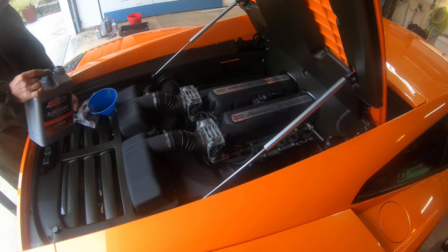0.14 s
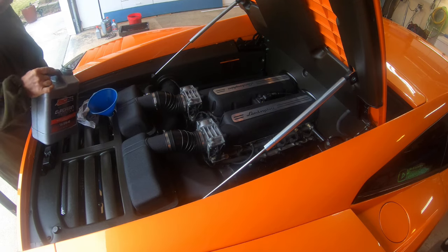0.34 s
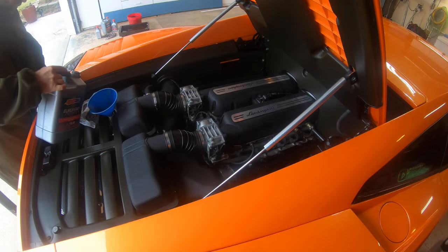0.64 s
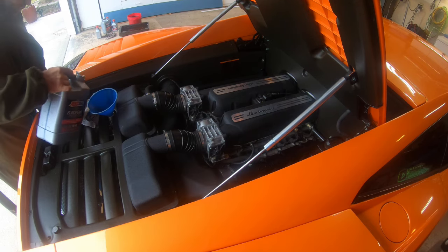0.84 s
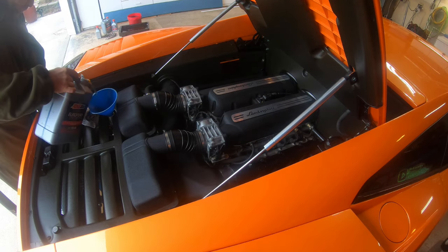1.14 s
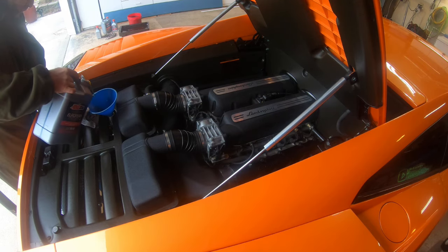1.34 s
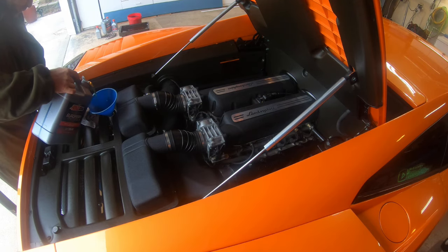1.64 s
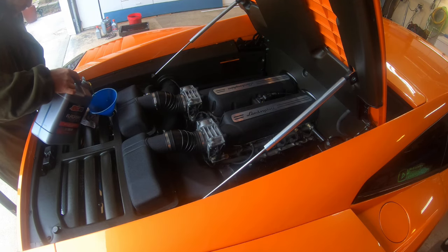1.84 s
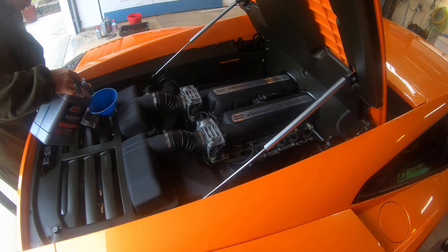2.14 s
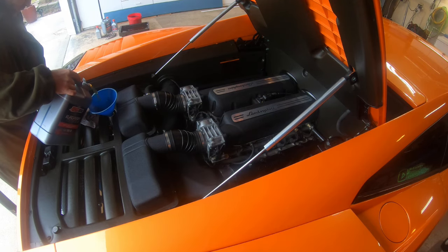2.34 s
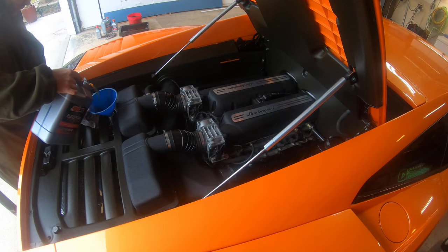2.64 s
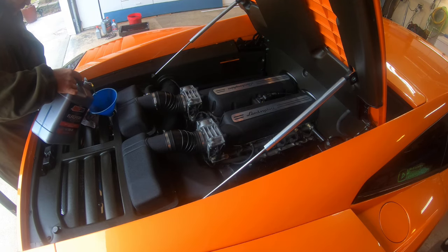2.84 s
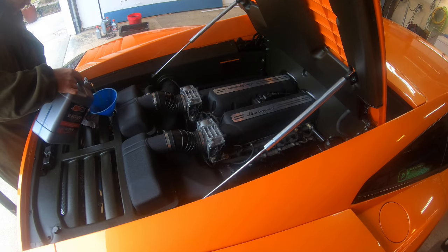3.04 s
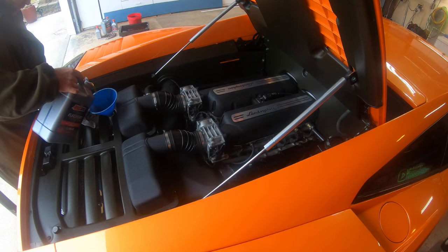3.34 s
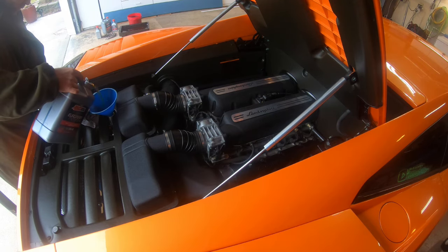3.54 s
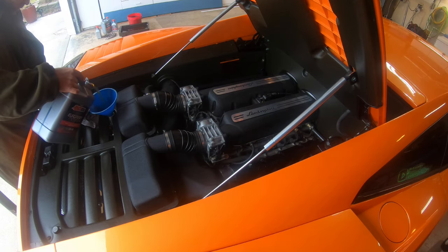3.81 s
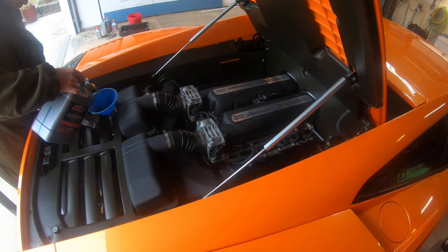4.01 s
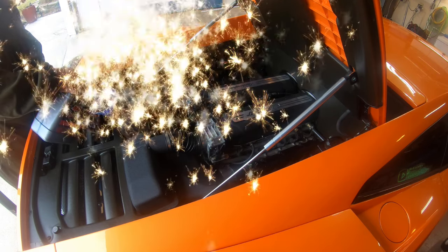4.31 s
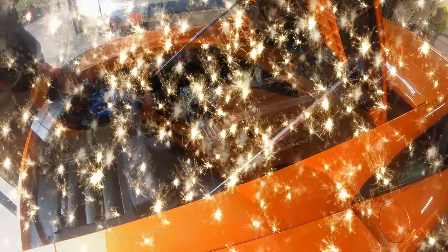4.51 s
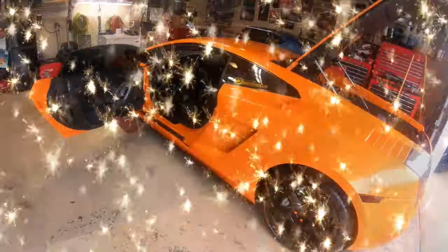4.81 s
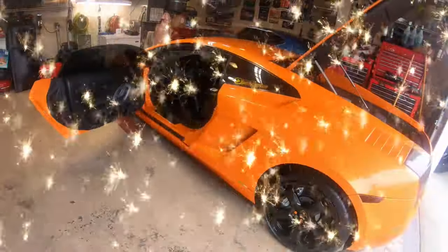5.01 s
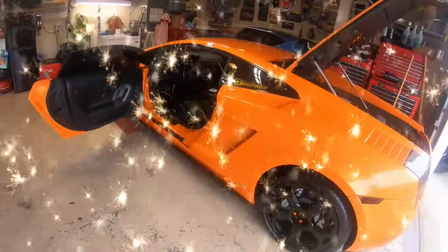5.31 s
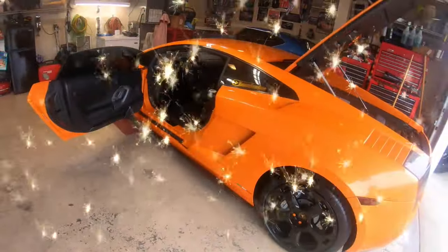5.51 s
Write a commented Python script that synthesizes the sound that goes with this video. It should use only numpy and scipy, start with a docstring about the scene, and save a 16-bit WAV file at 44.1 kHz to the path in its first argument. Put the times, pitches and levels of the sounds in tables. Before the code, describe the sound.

Thick oil gulps, pops and trickles from a plastic jug in a garage, stops dead, and a big car engine idles loudly.

```python
"""A sleeve rustles and a plastic jug knocks as it is tipped over a funnel in an engine bay, in a garage.
The oil glugs: gulps of air thump, bubbles pop, clear tones ring, and the stream trickles and squelches.
The sound stops dead; after a short silence a big engine fades in, idling.
Cloth, air and stream are coloured noise, impacts are kicks into decaying resonances, clear tones and
froth are damped sines, and the engine is a set of firing orders with mechanical noise."""
import sys
import numpy as np
from scipy import signal
from scipy.fft import rfft, irfft
from scipy.io import wavfile
from scipy.ndimage import uniform_filter1d

SR = 44100
rng = np.random.default_rng(int(sys.argv[2]) if len(sys.argv) > 2 else 0)


def pcm_store(signal):
    """Save signal as 16-bit PCM."""
    levels = np.round(np.clip(np.atleast_2d(signal), -1, 1) * 32767)
    wavfile.write(sys.argv[1], SR, levels.astype(np.int16).T)


N = 249958
TIME = np.arange(N) / SR


def gain_of(db):
    """Logarithmic levels: decibels become an amplitude ratio."""
    return 10 ** (np.asarray(db) / 20)


def evened(x):
    """Power normalisation: scales all channels so that the first has rms 1."""
    return x / np.sqrt(np.mean(np.atleast_2d(x)[0] ** 2) + 1e-20)


def level(rows):
    """Amplitude envelope: gain over time from rows of (s, dB), silent outside them."""
    return gain_of(np.interp(TIME, *np.transpose(rows), left=-200, right=-200))


def colour(x, points):
    """Linear filtering: weights the spectrum by points of (Hz, dB), joined on a log frequency axis."""
    hz, db = np.transpose(points)
    bins = np.fft.rfftfreq(N, 1 / SR)
    gain_db = np.interp(np.log(bins + 1), np.log(hz + 1), db)
    return irfft(rfft(x) * gain_of(gain_db), N)


def noise(points):
    """Coloured noise: independent mid and side of a given spectrum, mid at rms 1."""
    return evened(colour(rng.standard_normal((2, N)), points))


def wander(size, count=N):
    """Smoothed chance: a slow random curve of rms 1, changing over about size samples."""
    smooth = uniform_filter1d(rng.standard_normal(count), size)
    return evened(uniform_filter1d(smooth, size))


def band(x, hz, q):
    """Simple resonator: a fixed band-pass of gain 1 at its centre."""
    w = 2 * np.pi * min(hz, SR / 2 - 1000) / SR
    a = np.sin(w) / (2 * q)
    return signal.lfilter([a, 0, -a], [1 + a, -2 * np.cos(w), 1 - a], x)


def resonate(x, hz, width_hz):
    """Moving resonance: shifts the curve hz down to zero, smooths there, and shifts back up."""
    turn = np.exp(2j * np.pi * np.cumsum(hz) / SR)
    r = np.exp(-np.pi * width_hz / SR)
    return 2 * (turn * signal.lfilter([1 - r], [1, -r], x / turn)).real


# Spectrum of the sliding cloth. Each row: frequency in Hz, relative level in dB per Hz.
SLEEVE_SPECTRUM = [(150, -32), (250, 5), (364, -3.5), (486, -21), (770, -1), (929, -9.5), (1520, 0),
                   (1750, -4), (3220, -4.5), (8230, -13.5), (14700, -33)]
# Rise and fall of the rustle. Each row: time in seconds, level in dB before the trim.
SLEEVE_LEVEL = [(0.0, -64), (0.11, -58.5), (0.274, -60.5), (0.508, -61.5), (0.636, -62), (0.828, -65),
                (1.13, -71.5), (1.25, -76)]


def sleeve(catch_db=1, snags_per_s=220, snag_db=-6, trim_db=-1):
    """Stick-slip friction: cloth slides over cloth, catching unevenly; single fibres snag and let go."""
    snags = (rng.random(N) < snags_per_s / SR) * rng.exponential(1, N)
    release = np.exp(-np.arange(600) / 130)
    scratch = evened(signal.oaconvolve(snags, release)[:N])
    cloth = noise(SLEEVE_SPECTRUM) + gain_of(snag_db) * scratch * noise(SLEEVE_SPECTRUM)
    return level(SLEEVE_LEVEL) * gain_of(trim_db + catch_db * wander(size=500)) * cloth


# Spectrum of the still air. Each row: frequency in Hz, relative level in dB per Hz.
AIR_SPECTRUM = [(12, -41), (20, -15), (42, -22), (117, -31.5), (177, -9.5), (283, -37.5), (344, -17.5),
                (429, -28.5), (520, -24), (565, -33), (667, -22), (955, -28), (1900, -34), (3910, -34),
                (14700, -65)]
# The hollow low drone. Each row: time in seconds, level in dB before drone_db is added.
DRONE_LEVEL = [(0, -65.5), (.95, -79), (1.17, -55), (1.28, -67.5), (2.0, -62), (2.9, -69.5), (4.25, -59),
               (4.6, -64.5), (4.77, -59.5), (5.26, -60)]
# The soft low bump. Each row: time in seconds, level in dB.
BUMP_LEVEL = [(3.56, -87), (3.595, -46), (3.635, -43), (3.67, -52), (3.73, -55), (3.8, -65.5),
              (3.87, -71.5)]
# Spectrum of the bump. Each row: frequency in Hz, relative level in dB per Hz.
BUMP_SPECTRUM = [(15, -36.5), (25, 1), (49, 5), (75, -1.5), (102, 2), (173, 5.5), (250, -40), (320, -49),
                 (550, -120)]


def garage(air_db=-65, drone_hz=176, drone_q=5.24, drone_db=-2):
    """Broadband and resonant background: still air, a hollow drone and one soft bump."""
    hollow = band(rng.standard_normal((2, N)), drone_hz, drone_q)
    drone = evened(band(hollow, drone_hz, drone_q))
    air = gain_of(air_db) * noise(AIR_SPECTRUM)
    bump = level(BUMP_LEVEL) * noise(BUMP_SPECTRUM)
    return air + gain_of(drone_db) * level(DRONE_LEVEL) * drone + bump


# Resonances of the jug and funnel. Each row: frequency in Hz, bandwidth in Hz, and level in dB
# over the unringing sound before ring_db is added.
JUG_MODES = [(281, 34, -0.5), (375, 42, -9.5), (488.6, 8.8, -6), (745, 18, 1.5), (939, 8.2, -3),
             (1219, 146, -8), (1642, 5.7, 0), (1952, 16, 0), (2360, 24, -4), (2653, 14, -3), (3067, 20, 0),
             (3443, 76, -3.5), (3760, 23, 1), (4110, 35, -2), (4560, 13, -28), (6000, 21, -5),
             (7400, 110, -8.5)]


def jug(x, ring_db):
    """Modal resonance: adds the ringing of the plastic jug and funnel to the sound that excites it."""
    return x + sum(gain_of(db + ring_db) * band(x, hz, hz / width) for hz, width, db in JUG_MODES)


def bursts(rows, direct, ring_db, room_db, room_t60, low_hz, rise_s):
    """Impulse and reverberation: each kick arrives directly, then off the engine bay, then garage walls.

    Each row: start in seconds, level in dB, centre in Hz, sharpness Q, t60 in seconds."""
    out, t = np.zeros((2, N + SR)), np.arange(SR // 2) / SR
    low_cut = signal.butter(4, low_hz, "high", fs=SR, output="sos")
    for s, db, hz, q, t60 in rows:
        near_decay = gain_of(-60 * t / t60)
        room_decay = gain_of(room_db - 60 * t / room_t60)
        echoes = np.hypot(near_decay, room_decay)
        size = np.linalg.norm(echoes)
        kick = echoes * (1 - np.exp(-t / rise_s)) * rng.standard_normal((2, len(t)))
        kick[0, 0] += direct * size  # the direct arrival is in the mid only
        shaped = band(band(kick, hz, q), hz, q)
        sound = signal.sosfilt(low_cut, jug(shaped, ring_db))
        at = round(s * SR)
        # equal energy to the bare decay, so that level is where the decay starts
        out[:, at:at + len(t)] += gain_of(db) * size * sound / np.linalg.norm(sound[0])
    return out[:, :N]


# Handling of the jug. Each row: start in seconds, level in dB, centre in Hz, sharpness Q, t60 in seconds.
KNOCKS = [(.479, -53, 2540, 2, 0.1), (.631, -51.5, 610, 0.22, 0.2), (.885, -47.5, 2140, 0.33, 0.12),
          (1.582, -55.5, 290, 1.5, 0.079), (1.592, -66, 3220, 2.2, 0.11), (1.641, -51, 1540, 2.2, 0.068)]


def knocks():
    """Impact excitation: handling knocks set the jug ringing."""
    return bursts(KNOCKS, direct=0.41, ring_db=6, room_db=-6, room_t60=.3, low_hz=149.5, rise_s=0.0005)


# The running stream as the jug tips. Each row: time in seconds, level in dB without the surges.
FLOW_LEVEL = [(1.5, -75), (1.7, -63), (1.95, -62), (2.6, -62), (3.3, -64), (3.68, -53.5), (3.9, -59.5),
              (4.5, -57), (5.27, -62)]


def flow(surge_db=-15.5, surge_lag_s=0.026):
    """Addition of powers: a steady run, and a surge of oil that swells and ebbs after each gulp."""
    power = level(FLOW_LEVEL) ** 2
    age = np.arange(SR // 2) / SR / surge_lag_s  # the surge peaks at age 1
    for s, gulp_db, _ in GULPS:
        part = power[round(s * SR):][:len(age)]  # a view, so adding here adds to power
        surge = gain_of(gulp_db + surge_db) * age * np.exp(1 - age)
        part += (surge ** 2)[:len(part)]
    return np.sqrt(power)


# Colour of the stream. Each row: frequency in Hz, relative level in dB per Hz.
STREAM_SPECTRUM = [(88, -51), (150, -3), (290, -1), (615, -16), (739, -12.5), (1070, -24), (1210, -10),
                   (2030, -17.5), (2570, -34), (3920, -26), (8630, -35.5), (12000, -49.5), (15600, -87.5),
                   (22000, -120)]


def trickle(per_s=260, spread_db=5.5, t60=0.32):
    """Random impulse train: many tiny bubbles tick in the funnel under the stream, and reverberate."""
    ticked = rng.random(N) < per_s / SR
    strength = gain_of(spread_db * np.minimum(rng.exponential(1, N), 4))
    ticks = ticked * strength * rng.choice([-1, 1], N)
    t = np.arange(SR // 4) / SR
    echoes = rng.standard_normal((2, len(t))) * gain_of(-60 * t / t60)
    wet = signal.fftconvolve(ticks[None], echoes, axes=1)[:, :N]
    return evened(colour(jug(wet, ring_db=1.5), STREAM_SPECTRUM))


def froth(per_s=170, low_hz=600, high_hz=4200, cycles=11, spread_db=3, rise=0.073, trim_db=-6, count=24):
    """Damped bubble resonance: small bubbles of many sizes blip briefly in the thick oil."""
    out, t = np.zeros((2, N)), np.arange(SR // 12) / SR
    for hz in np.geomspace(low_hz, high_hz, count):
        decay = np.exp(-t * hz / cycles)
        tone = np.sin(2 * np.pi * hz * (t + rise * t * t))  # pitch lifts as the blip fades
        blip = decay * tone * np.sqrt(low_hz / hz)
        born = rng.random(N) < per_s / count / SR
        births = born * gain_of(spread_db * np.minimum(rng.exponential(1, N), 3))
        mid_and_side = [1, rng.uniform(-1.2, 1)]  # each size has its own place
        out += np.outer(mid_and_side, signal.oaconvolve(births, blip)[:N])
    return gain_of(trim_db) * evened(out)


# Bubbles bursting at the spout and in the funnel. Each row: start in seconds, level in dB, centre in Hz,
# t60 in seconds.
POPS = [(1.862, -55, 1350, .14), (2.015, -50, 1290, 0.16), (2.081, -54.5, 3020, 0.18),
        (2.219, -50, 1690, 0.23), (2.265, -48.5, 1330, 0.21), (2.325, -55, 1420, .08),
        (2.486, -43, 1010, 0.16), (2.496, -47.5, 1730, 0.12), (2.83, -51.5, 2060, 0.24),
        (3.0587, -44, 1600, 0.13), (3.11, -46, 2080, 0.11), (3.198, -48.5, 1330, .21),
        (3.434, -45.5, 1340, 0.14), (3.48, -55, 3000, .06), (3.514, -47.5, 1270, 0.13),
        (3.583, -55.5, 2970, 0.46), (3.663, -52.5, 1580, 0.72), (3.786, -40, 2020, 0.1),
        (3.877, -44.5, 1450, 0.099), (3.9212, -33.5, 1260, .07), (4.008, -49, 1250, 0.18),
        (4.166, -49.5, 1450, 0.14), (4.252, -51.5, 2540, 0.1), (4.288, -40, 1180, 0.11),
        (4.372, -52.5, 1900, 0.34), (4.436, -58, 3100, 0.18), (4.554, -52.5, 1660, 0.095),
        (4.666, -45, 2080, .1), (4.825, -53.5, 2430, 0.18), (4.894, -46.5, 1250, .12),
        (4.929, -49.5, 1460, 0.24), (5.004, -44, 1270, .13), (5.14, -54, 1670, .28),
        (5.224, -43.5, 1240, 0.1)]


def pops(q=0.93):
    """Sudden pressure release: short wet cracks, each centred on the pitch of its bubble."""
    rows = [(s, db, hz, q, t60) for s, db, hz, t60 in POPS]
    return bursts(rows, direct=0.26, ring_db=8.5, room_db=-14, room_t60=0.34, low_hz=220, rise_s=.0006)


# Air gulped into the jug. Each row: start in seconds, level in dB, t60 in seconds.
GULPS = [(1.925, -43.5, 0.38), (2.012, -52.5, 0.41), (2.195, -48.5, 0.37), (2.268, -41, 0.16),
         (2.327, -44.5, 0.14), (2.485, -49.5, 0.27), (2.517, -41, 0.2), (2.651, -47.5, 0.15),
         (2.768, -39, 0.24), (2.797, -40.5, 0.092), (2.852, -47, 0.15), (2.888, -56, .1),
         (2.981, -47, 0.32), (3.068, -45.5, 0.1), (3.11, -48, 0.48), (3.197, -46.5, 0.19),
         (3.268, -46.5, 0.23), (3.433, -47.5, 1), (3.513, -45.5, 0.22), (3.544, -41.5, 0.076),
         (3.715, -43.5, 0.13), (3.805, -48.5, 0.16), (3.877, -44, 0.32), (3.923, -44, 0.048),
         (4.051, -45.5, 0.11), (4.251, -39.5, 0.097), (4.288, -42.5, 0.18), (4.439, -48, 0.29),
         (4.477, -49.5, 0.4), (4.519, -42.5, 0.13), (4.664, -46, .24), (4.717, -40, 0.26),
         (4.744, -38, 0.075), (4.893, -49.5, 0.2), (5.008, -47.5, 0.26), (5.118, -53.5, 0.52),
         (5.196, -47.5, 0.36), (5.225, -40.5, 0.19)]


def gulps(q=0.53, first_hz=422, sag_hz_per_s=35.5):
    """Cavity resonance: thumps damped heavily by thick oil, deepening as the air pocket in the jug grows."""
    first_s = GULPS[0][0]
    rows = [(s, db, first_hz - sag_hz_per_s * (s - first_s), q, t60) for s, db, t60 in GULPS]
    return bursts(rows, direct=0.35, ring_db=10.5, room_db=-24, room_t60=0.27, low_hz=200, rise_s=0.0026)


# Clear ringing tones of the jug, funnel and bubbles. Each row: start in seconds, direct peak level in dB,
# starting pitch in Hz.
CLEAR_TONES = [(1.926, -41, 586), (1.948, -40.5, 678), (2.012, -48.5, 1463), (2.329, -41, 753),
               (2.328, -51.5, 1690), (2.496, -39, 1318), (2.5, -46.5, 2694), (2.67, -49, 810),
               (2.984, -44, 763), (3.062, -42.5, 1740), (3.112, -42, 1263), (3.27, -42.5, 756),
               (3.514, -44, 1234), (3.787, -41, 2644), (3.786, -44, 1880), (3.9215, -37, 905),
               (4.288, -49, 1207), (4.371, -46, 2360), (4.38, -49, 2000), (4.829, -48, 2650),
               (4.929, -53.5, 4230)]


def clear_tones(t60_at_1khz=0.16, damping=.1, rise=0.071, room_db=-19, room_t60=0.29):
    """Damped oscillation: clear tones of the jug, funnel and bubbles, each lifting slightly in pitch."""
    dry, t = np.zeros(N), np.arange(SR // 4) / SR
    for s, db, hz in CLEAR_TONES:
        at = round(s * SR)
        t60 = t60_at_1khz * (1000 / hz) ** damping  # higher tones die sooner
        tone = np.sin(2 * np.pi * hz * (t + rise * t * t))
        dry[at:at + len(t)] += gain_of(db - 60 * t / t60) * tone
    echoes = rng.standard_normal((2, len(t))) * gain_of(-60 * t / room_t60)
    echoes /= np.linalg.norm(echoes[0])
    wet = gain_of(room_db) * signal.fftconvolve(dry[None], echoes, axes=1)[:, :N]
    return wet + np.array([dry, np.zeros(N)])


# Droplets spattering the funnel wall. Each row: start in seconds, level in dB, centre in Hz.
DROPLETS = [(2.084, -52.5, 5770), (2.222, -61.5, 3200), (2.266, -60, 4800), (2.501, -48, 2880),
            (2.627, -56.5, 4440), (2.832, -63, 6000), (3.058, -48.5, 4700), (3.11, -57.5, 6900),
            (3.197, -58.5, 4240), (3.514, -58, 4160), (3.709, -56, 2480), (3.787, -52.5, 3700),
            (3.936, -48, 3050), (4.012, -62, 6550), (4.054, -57, 6900), (4.181, -56.5, 6150),
            (4.332, -57, 4250), (4.402, -56, 4800), (4.514, -61, 6070), (4.669, -51, 5740),
            (4.828, -59, 4500), (4.928, -52, 4340), (4.93, -52, 2480), (5.119, -60.5, 5800)]


def droplets(q=2.9, t60=0.1):
    """Light impact: thin, bright ticks on the plastic."""
    rows = [(s, db, hz, q, t60) for s, db, hz in DROPLETS]
    return bursts(rows, direct=0.9, ring_db=8.0, room_db=-18.0, room_t60=0.12, low_hz=2000, rise_s=0.00057)


# Air sucked through the gap in the spout. Each row: start in seconds, length in seconds before half
# the release is added, level in dB, starting resonance in Hz.
SQUELCHES = [(2.507, 0.15, -61.5, 2640), (2.845, 0.16, -61, 2480), (3.018, .17, -54.5, 1820),
             (3.223, 0.18, -64, 2460), (3.652, 0.12, -69, 2430), (4.094, 0.14, -64, 2020),
             (4.356, 0.058, -62.5, 2280)]


def squelch(width_hz=680, flutter_db=2.5, fall_oct_per_s=2.76, rise_s=0.023, release_s=0.05):
    """Turbulence in a gliding resonator: air flutters past the oil as the gap's resonance slides down."""
    out = np.zeros((2, N))
    air = rng.standard_normal((2, N)) * gain_of(flutter_db * wander(size=250))
    for s, length, db, hz in SQUELCHES:
        t = np.arange(0, length + release_s / 2, 1 / SR)
        pitch = hz * 2 ** (-fall_oct_per_s * t)
        swell = np.minimum(t / rise_s, 1) * np.minimum((t[-1] - t) / release_s, 1)
        at = round(s * SR)
        span = slice(at, at + len(t))
        gap = resonate(resonate(air[:, span], pitch, width_hz), pitch, width_hz)
        out[:, span] += gain_of(db) * swell * evened(gap)
    return out


# Orders of the exhaust note. Each row: multiple of one bank's firing rate, relative level in dB.
EXHAUST_ORDERS = [(1, -19), (2, 2), (3, -24), (4, -3.5), (5, -22), (6, -11), (7, -21.5), (8, -15), (9, -34),
                  (10, -23.5), (11, -31), (12, -36)]
# Spectrum of the mechanical noise. Each row: frequency in Hz, relative level in dB per Hz.
CLATTER_SPECTRUM = [(120, -49), (200, -12), (235, 2), (287, -12), (403, -22), (538, -23.5), (610, -14),
                    (784, -21.5), (973, -21), (1060, -28.5), (1320, -25.5), (3250, -37.5), (8730, -54),
                    (14700, -59)]


def engine(firings_per_s=79.65, exhaust_db=-11.5, clatter_db=-27.5, throb=0.19, rough=0.087,
           start_s=5.46, fade_s=0.097):
    """Harmonic series: two banks fire in turn; uneven firings roughen upper orders, and clatter throbs."""
    t = TIME[TIME >= start_s] - start_s
    turns = firings_per_s / 2 * t  # firings of one bank
    exhaust = 0
    for k, db in EXHAUST_ORDERS:
        drift = wander(size=800, count=len(t)) + 1j * wander(size=800, count=len(t))
        uneven = 1 + min(rough * k, 1) * drift
        order = np.exp(2j * np.pi * (round(k) * turns + rng.random()))
        exhaust += gain_of(db) * evened((uneven * order).real)
    swell = 1 + throb * np.cos(2 * np.pi * 2 * turns)  # once per firing of either bank
    clatter = evened(noise(CLATTER_SPECTRUM)[0, :len(t)] * swell)
    idle = gain_of(exhaust_db) * evened(exhaust) + gain_of(clatter_db) * clatter
    fade = np.sin(np.pi / 2 * np.minimum(t / fade_s, 1)) ** 2
    return np.pad(idle * fade, (N - len(t), 0))


# Stereo width of the pour. Each row: frequency in Hz, gain of the side signal in dB.
WIDTH = [(60, -4), (200, -7), (370, -12.5), (680, -1), (1250, -1), (2300, -3), (4230, -7), (7760, 2.5),
         (14200, 0.5)]


def scene(stop_s=5.266):
    """Superposition: the pour is wide, built as mid and side, and stops dead; the engine is dead centre."""
    stream = flow() * (trickle() + froth())
    oil = stream + pops() + gulps() + clear_tones() + droplets() + squelch()
    mid, side = (sleeve() + garage() + knocks() + oil) * (TIME < stop_s)
    side = colour(side + .11 * mid, WIDTH)  # the jug is a little to the left
    return np.array([mid + side, mid - side]) + engine()


def record(dry, edge_hz=14800):
    """Band limitation: the microphone dulls the top octave, then a steep low-pass ends the band."""
    microphone = signal.firwin2(129, [0, 8800, 11500, SR / 2], gain_of([-1.5, 0.0, -12.5, -20.5]), fs=SR)
    dull = signal.oaconvolve(dry, microphone[None], "same")
    low_pass = signal.firwin(511, edge_hz, window=("kaiser", 9), fs=SR)
    return signal.oaconvolve(dull, low_pass[None], "same")


dry = scene()
out = record(dry)
pcm_store(out)
```